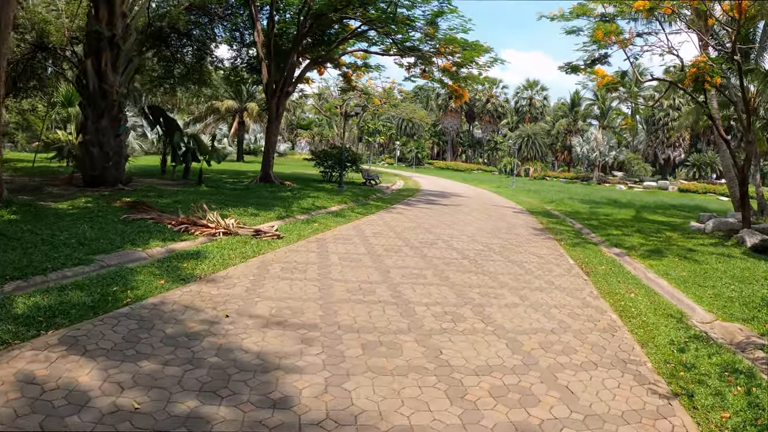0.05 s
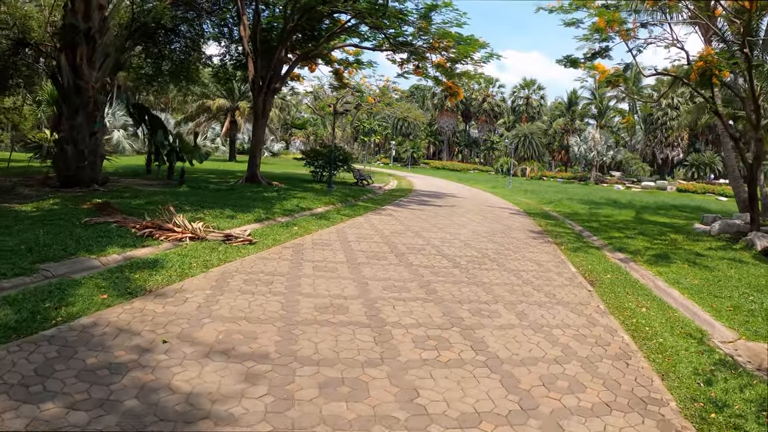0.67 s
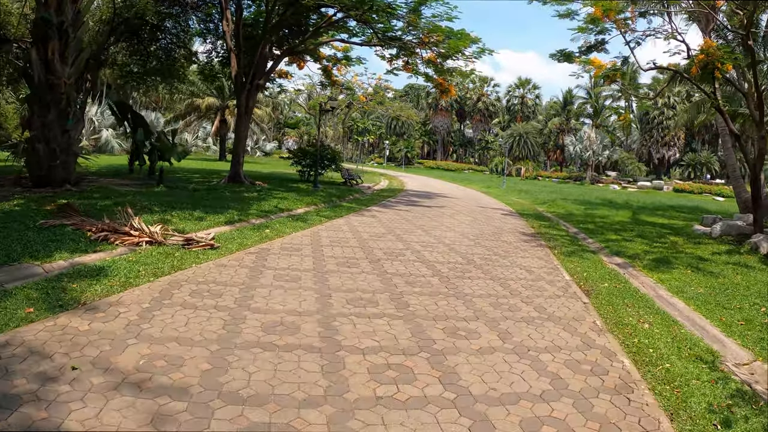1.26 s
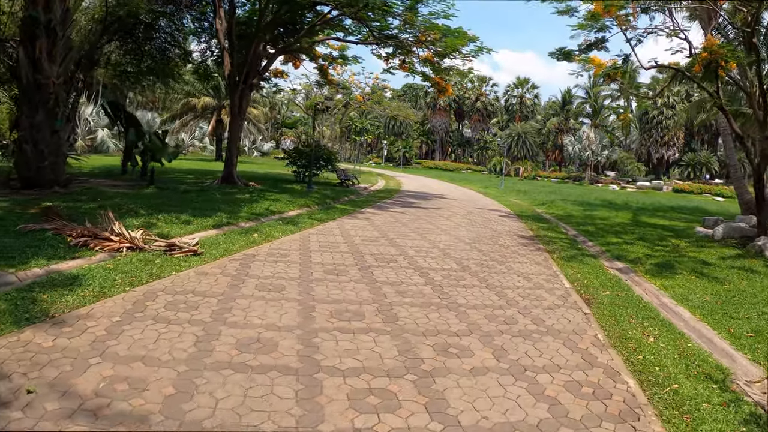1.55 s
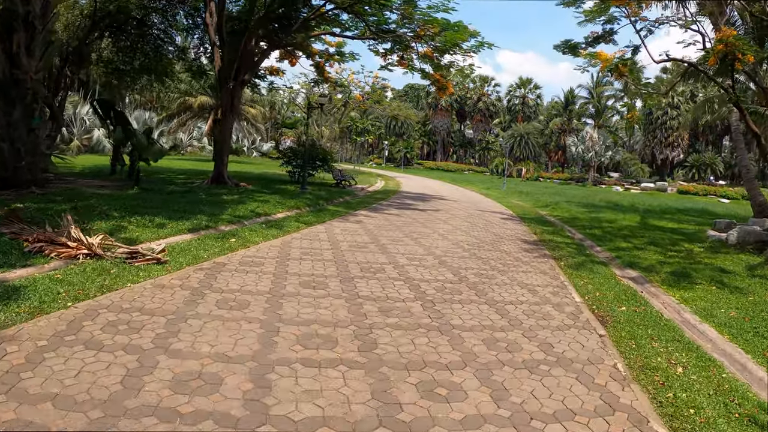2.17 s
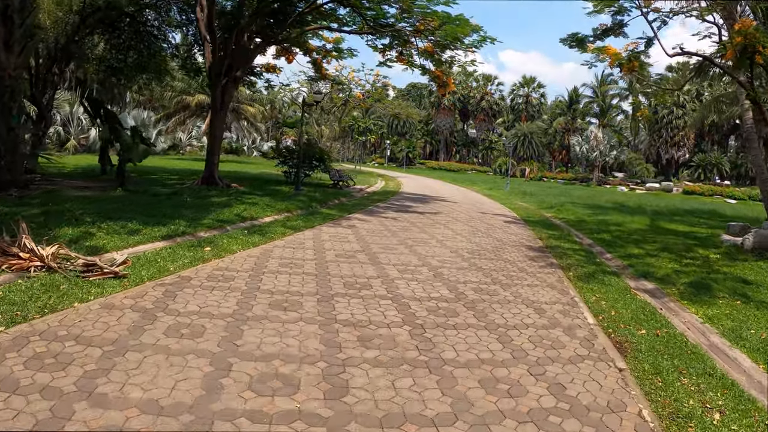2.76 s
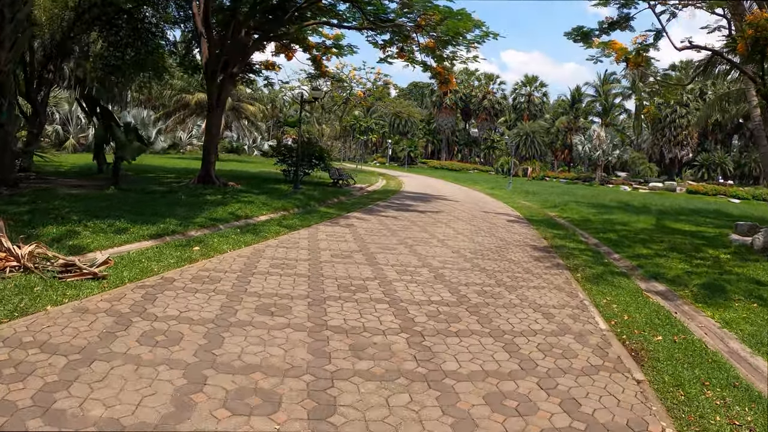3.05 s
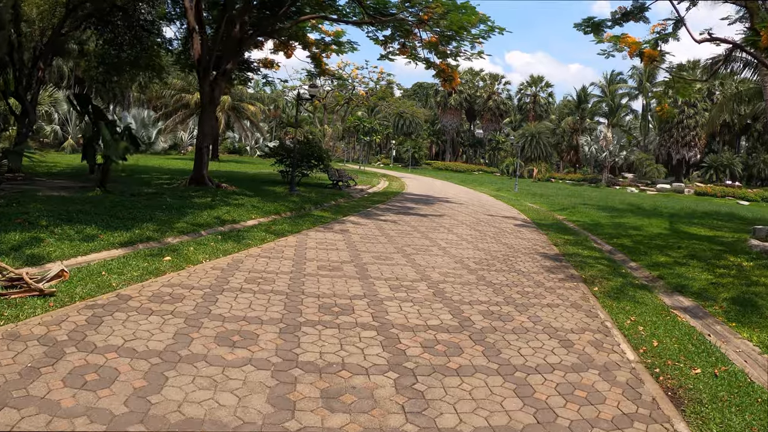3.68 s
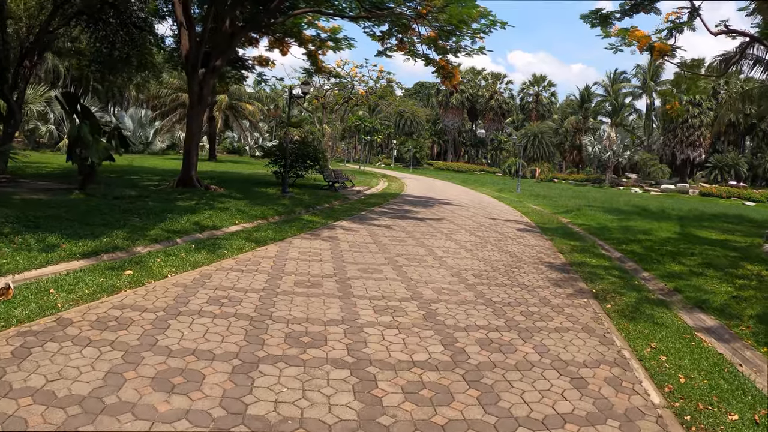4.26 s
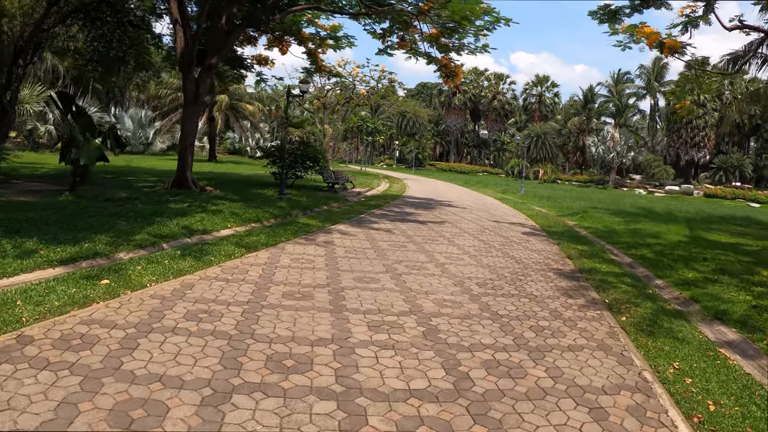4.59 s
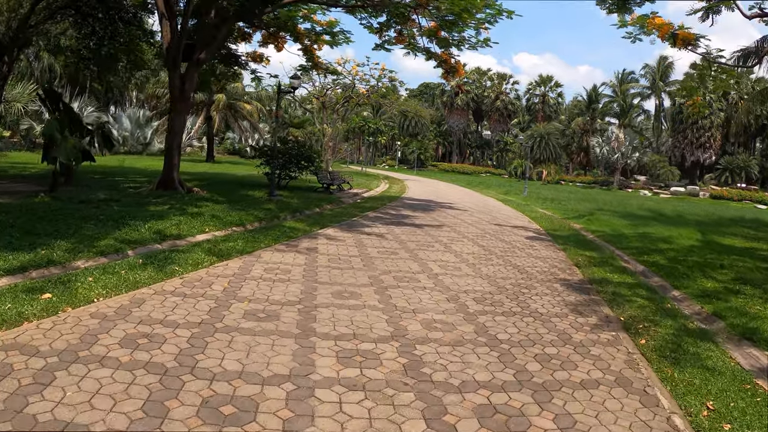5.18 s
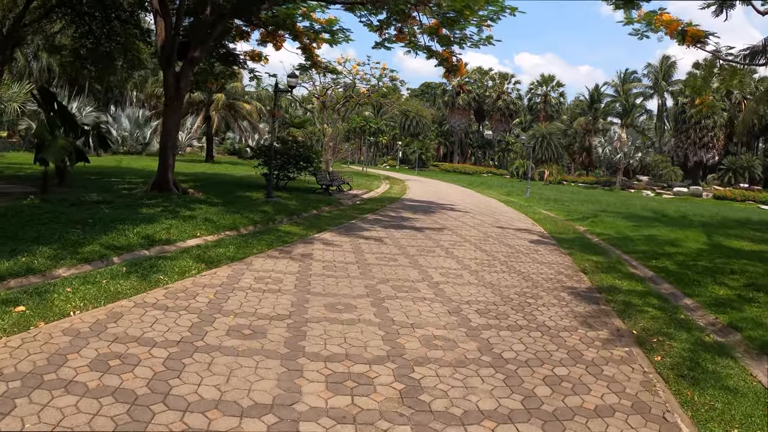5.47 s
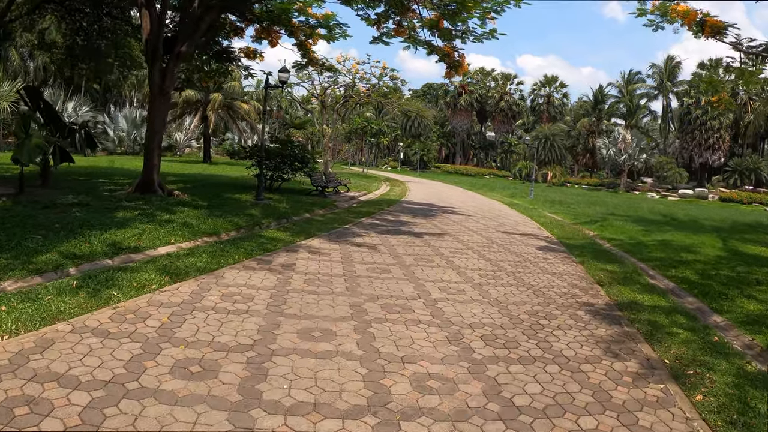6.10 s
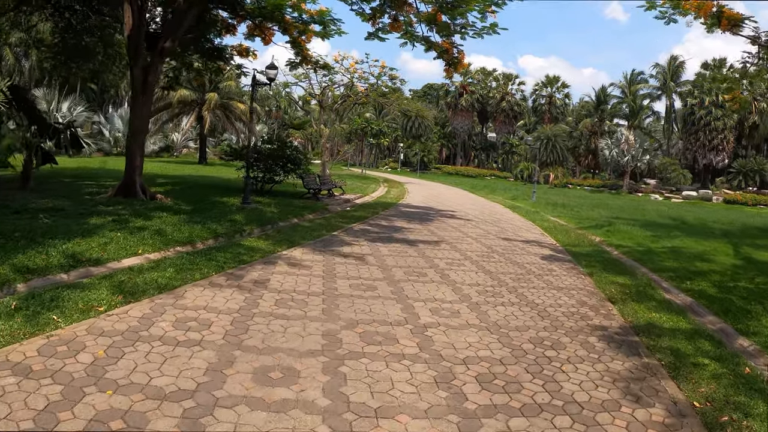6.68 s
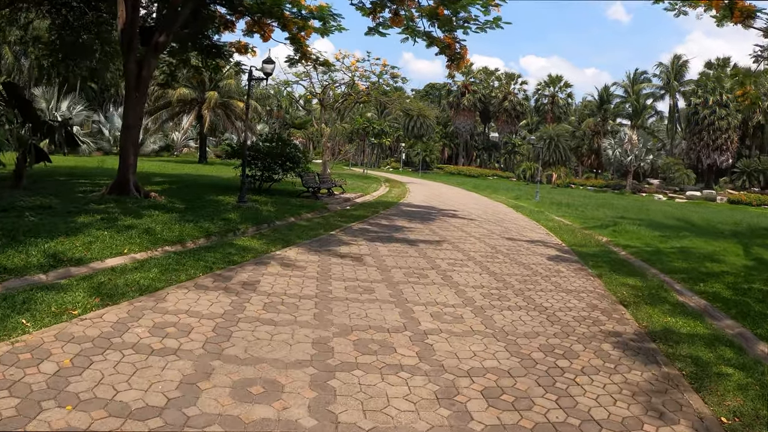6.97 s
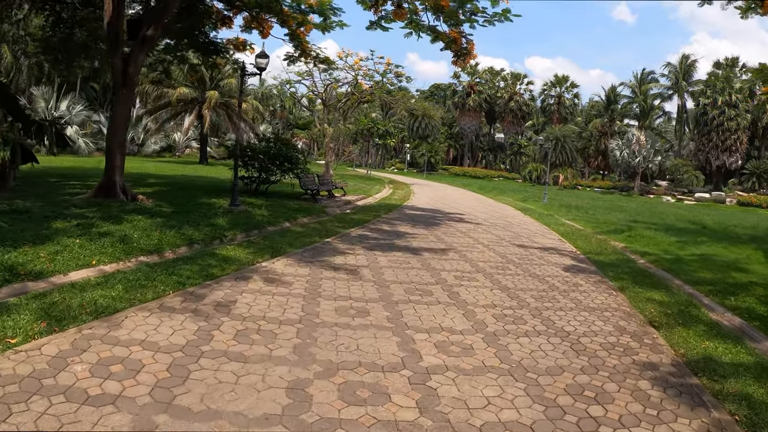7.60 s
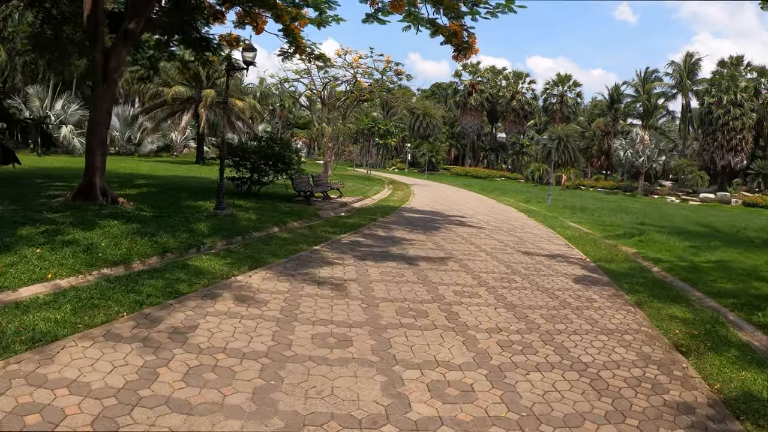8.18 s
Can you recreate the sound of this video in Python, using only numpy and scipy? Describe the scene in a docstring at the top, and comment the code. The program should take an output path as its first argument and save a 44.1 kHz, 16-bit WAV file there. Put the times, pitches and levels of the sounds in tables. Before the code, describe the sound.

A steady low rumble of distant road traffic fills a park throughout, with softer tyre hiss and a very faint rustle of leaves. In the first second a far crow caws quietly and small birds peep and twitter. From about 1 to 2 seconds a thin, high song steps downward over a dry bird rattle. At 3 seconds a grain of grit cracks sharply under a shoe, close by, and a low engine drone comes in. The crow caws faintly again at 4 seconds, while another far engine, slowly gathering speed, swells around 4.5. Small gritty cracks recur between 5 and 7.5 seconds. The engines swell again near 6.8 seconds. From 6.5 to 7.5 a nearer bird gives four quick two-note calls, then a faint wavering song runs on over the traffic until the end, at about 8.5 seconds.

```python
"""A slow walk on a paved park path. Far traffic rumbles and its tyres hiss throughout; leaves rustle.
From the start one engine slowly gathers speed; a far crow caws, small birds peep and twitter in the trees.
Near 1 s a thin song steps down over a dry rattle. From 3 s grit cracks under the soles, close by, and
a second engine drones in; the crow returns at 4 s. From 6.5 s a nearer bird repeats a two-note call,
and a wavering song closes."""
import sys
import numpy as np
from scipy import signal
from scipy.fft import rfft, irfft
from scipy.io import wavfile

SR = 44100
rng = np.random.default_rng(int(sys.argv[2]) if len(sys.argv) > 2 else 0)


def int16_out(signal):
    """Quantize to a 16-bit WAV file."""
    q = np.round(np.clip(np.atleast_2d(signal).T, -1, 1) * 32767)
    wavfile.write(sys.argv[1], SR, q.astype(np.int16))


N = 372512
TIME = np.arange(N) / SR

# noise spectra: f/Hz, relative density/dB
RUMBLE_SPECTRUM = [(8, -23), (16, -5), (27, -4), (45, -3.5), (63, 2), (78, -3), (105, -4.5), (135, -9.5),
                   (165, -15.5)]
ROAR_SPECTRUM = [(125, 0.5), (160, 1.5), (200, -1.5), (255, -5.5), (330, -8.5), (440, -13), (640, -15.5),
                 (850, -25.5)]
TYRE_SPECTRUM = [(600, -15.5), (750, -5.5), (950, 0), (1200, -3), (1500, -7), (1950, -10.5), (2350, -16),
                 (2900, -30.5), (3600, -25.5)]
SCRAPE_SPECTRUM = [(500, -14), (1500, 8), (3000, -7.5), (6000, -15.5), (9000, -27.5), (13000, -32),
                   (15000, -46)]
RUSTLE_SPECTRUM = [(2600, 4), (3200, -3), (3900, -5.5), (5000, -9), (6300, -11.5), (7800, -14.5),
                   (9000, -18.5), (10000, -23.5), (12500, -29.5), (14000, -33.5), (15300, -63.5)]
# traffic density: t/s, level/dB
TRAFFIC_FLOW = [(0, -1.5), (1.2, -0.9), (2.4, -1.5), (3.3, -1.2), (5, -1), (6.9, 0), (8.45, 0)]
# merged engine roar: t/s, level/dB
ROAR_ENVELOPE = [(0, -36), (1.2, -35.5), (3, -34.5), (4.7, -35), (6.4, -34), (7.3, -35.5), (8.45, -34)]
# accelerating engine: exhaust order, peak t/s, half length/s, level/dB
EXHAUST_SWELLS = [(4, 4.45, 0.72, -27), (4, 5.58, .45, -34.5), (4, 6.8, 0.32, -30), (4, 8.14, 0.48, -37),
                  (6, 1.26, 0.46, -37.5), (6, 2.22, 0.32, -37.5), (6, 2.97, 0.37, -36.5),
                  (6, 4.66, 0.59, -37.5), (6, 6.4, 0.15, -38), (8, 1.45, 0.63, -40), (8, 6.4, 0.53, -42.5),
                  (9, 3.2, 0.34, -39.5), (9, 5.1, 1.3, -45), (11, 0.78, 0.42, -45.5), (11, 2.09, .25, -47)]
# second engine: t/s, firing f/Hz, level/dB
DRONE_CURVE = [(0, 78.05, -51), (3, 76, -35), (4.2, 83.3, -31.5), (5.6, 89.2, -32), (6.3, 90, -35.5),
               (6.75, 90.83, -26.5), (7.4, 90, -29), (8.45, 87.9, -28)]
# fainter engines: peak t/s, half length/s, f/Hz, level/dB
ENGINE_HUMS = [(5.3, .35, 207.8, -42.5), (7.1, 0.74, 148.6, -39)]
# single vehicles: peak t/s, half length/s, centre f/Hz, width/Hz, level/dB
VEHICLE_PASSES = [(0.91, 0.22, 295, 92, -43.5), (4, 0.68, 367, 130, -47), (6.46, 0.57, 410, 350, -45),
                  (6.9, 1, 900, 360, -45.5), (3.35, 0.57, 1300, 140, -47.5), (4.87, 0.91, 1250, 190, -48),
                  (5.42, 0.26, 1630, 1300, -48.5), (0.6, 0.28, 1950, 380, -52)]
# two-note calls: slur t/s, flick top f/Hz, rise/share of f, flick level/dB, slur level/dB
TWO_NOTE_CALLS = [(6.55, 4850, .12, -67, -45), (6.817, 4900, 0.099, -52, -41), (7.08, 4880, 0.18, -53, -44),
                  (7.36, 4760, .16, -57, -45)]
# bird notes: t/s, length/s, f/Hz, fall/share of f, level/dB
PEEP_NOTES = [(.115, .13, 2690, 0, -50.5), (.225, .13, 2700, -0.016, -53), (.258, 0.085, 3570, -.025, -52),
              (.468, .13, 3030, 0, -54), (.775, .037, 4200, 0.34, -54), (.958, 0.031, 4870, 0.011, -56),
              (1.298, .04, 3583, 0, -44.5), (1.35, .04, 3590, -0.022, -54), (3.138, 0.03, 4580, 0.08, -52),
              (4.095, 0.039, 3450, .03, -52), (4.425, .07, 3420, .025, -53), (4.52, .045, 4720, -.05, -57)]
WARBLE_NOTES = [(7.305, .065, 3290, 0.011, -54), (7.57, 0.066, 3510, .02, -56),
                (7.812, 0.046, 3350, -0.0056, -50.5), (7.965, .065, 3440, -.05, -56),
                (8.105, 0.048, 3250, .03, -48), (8.257, 0.073, 3060, 0.0022, -50),
                (8.415, .05, 3000, 0, -48)]
THIN_NOTES = [(0.875, 0.17, 9140, 0.22, -57), (1.068, 0.12, 7400, 0.012, -57.5),
              (1.23, 0.12, 6930, 0.06, -56), (1.411, 0.15, 7000, 0.024, -56.5),
              (1.572, 0.17, 6490, .026, -55), (1.759, 0.16, 6360, 0.012, -55)]
# bird rattle: t/s, f/Hz, tick rate/Hz, level/dB
RATTLE_CURVE = [(.97, 3600, 36, -45), (1.1, 3770, 44, -44.5), (1.2, 3500, 56, -42), (1.33, 3400, 55, -45),
                (1.42, 3000, 60, -48), (1.49, 2750, 54, -43), (1.64, 2700, 55, -47)]
# twitters: t/s, length/s, f/Hz, chip sweep/share of f, chip rate/Hz, level/dB
TWITTER_RUNS = [(0.195, 0.75, 4220, 0.74, 31, -60), (1.22, 0.21, 3530, 0.93, 32, -56),
                (5.08, 0.59, 3800, 0.15, 45, -61.5), (6.275, 0.68, 3950, .16, 50, -63),
                (6.279, 0.4, 7640, 0.15, 48, -69.5), (6.899, .22, 3700, 0.36, 62, -53.5),
                (7.0, 0.5, 3310, 0.18, 61, -58), (7.479, 0.7, 3400, 0.12, 58, -65)]
# caws: t/s, length/s, level/dB
CROW_CAWS = [(.15, .56, -49.5), (4.1, 0.33, -47.5)]
# crow's throat resonance: f/Hz, relative gain/dB
CROW_FORMANT = [(900, -21), (1250, -17), (1520, 6.5), (1850, 4.5), (2150, 0.5), (2500, -29)]
# cracking grains: t/s, level/dB, decay/s, ring f/Hz
GRIT_CRACKS = [(2.986, -31, 0.011, 1900), (2.987, -39, 0.0037, 6000), (2.989, -46, .003, 6000),
               (4.945, -51, 0.0074, 3800), (5.582, -47, .021, 4220), (5.608, -43.5, 0.0056, 10000),
               (5.617, -47, 0.0067, 4200), (5.619, -38, 0.006, 6600), (5.625, -44, .014, 6000),
               (5.788, -38, 0.0084, 3000), (6.019, -39, 0.0084, 3870), (6.225, -39, 0.012, 3900),
               (6.231, -38.5, .008, 5950), (6.448, -40.5, .008, 2900), (6.638, -40, 0.0056, 2740),
               (7.48, -45, .014, 2900)]
# swells of the high hiss: peak t/s, boost/dB
RUSTLE_BOOSTS = [(.45, 2.5), (1.35, 3), (3.2, 1.5), (4.3, 1.5), (5.35, 2.5), (6.42, 1.5)]
# noise likeness between channels: f/Hz, correlation
COHERENCE = [(25, .985), (60, .995), (120, .997), (300, .989), (520, .95), (760, .7), (980, .85),
             (1520, .72), (2050, .83), (3100, .72), (4000, .55), (5800, .1), (8000, .28)]
# microphone ports, far sound: f/Hz, left phase lag/rad
PORT_LAG_RAD = [(30, 0), (330, .09), (690, .7), (950, .25), (1400, .5), (1720, .38), (3100, 1.15),
                (4600, 1.25), (6200, 2.9)]
# microphone ports, colour: f/Hz, left minus right/dB
PORT_BALANCE_DB = [(200, .25), (540, 2.1), (850, -1.5), (1500, 0), (2750, 3), (3900, .5), (5200, 0),
                   (7800, -3.7), (9000, 3.7), (11000, .9)]


def road(rumble_db=-26, tyre_db=-39.5):
    """Many far vehicles merge into exhaust rumble, engine roar and the 1 kHz hump of tyres."""
    flow_db, = in_time(TRAFFIC_FLOW)
    roar_db, = in_time(ROAR_ENVELOPE)
    rumble = from_db(rumble_db + 0.73 * flow_db) * coloured(RUMBLE_SPECTRUM)
    roar = from_db(roar_db) * coloured(ROAR_SPECTRUM)
    tyres = from_db(tyre_db + flow_db + 0.5 * drift(20)) * coloured(TYRE_SPECTRUM)
    return rumble + roar + tyres


def accelerating_engine(start_hz=28.4, ramp_hz_per_s=0.54, top_hz=32.5):
    """The cycle rate climbs, then holds; its exhaust orders swell and fade."""
    cycle_hz = np.minimum(start_hz + ramp_hz_per_s * TIME, top_hz)
    out = np.zeros(N)
    for order in sorted({row[0] for row in EXHAUST_SWELLS}):
        swells = sum(from_db(db) * hump(s, half_s) for k, s, half_s, db in EXHAUST_SWELLS if k == order)
        out += swells * far_tone(order * cycle_hz, 0, waver=0.0022, fading_db=1.1)
    return out


def droning_engine():
    """A second engine, heard at its firing rate."""
    firing_hz, level_db = in_time(DRONE_CURVE)
    return far_tone(firing_hz, level_db, waver=0.013, fading_db=0.8)


def engine_hums():
    """Fainter engines come and go, one tone each."""
    return sum(hump(s, half_s) * far_tone(hz, db, waver=0.0061, fading_db=0.6)
               for s, half_s, hz, db in ENGINE_HUMS)


def passes():
    """Single vehicles rise out of the stream, each a band of engine or tyre noise."""
    return sum(from_db(db) * hump(s, half_s) * coloured([(hz - width_hz / 2, 0), (hz + width_hz / 2, 0)])
               for s, half_s, hz, width_hz, db in VEHICLE_PASSES)


def two_note_calls(flick_s=0.04, lead_s=0.058, slur_s=0.075, slur_decay_s=0.05):
    """A nearer bird: upward flick, then downward slur. The high flick scatters more."""
    out = np.zeros((2, N))
    for s, top_hz, rise, flick_db, slur_db in TWO_NOTE_CALLS:
        flick_hz = top_hz * (1 - rise * np.linspace(1, 0, 3) ** 2)
        flick = note(flick_s, flick_hz, tremble=0.007, flutter_db=2, bend=0.45)
        slur = note(slur_s, pitches_hz=(3020, 2400, 2230), tremble=0.025, flutter_db=2, bend=0.85)
        slur *= np.exp(-(TIME[:len(slur)] / slur_decay_s) ** 2 / 2)
        add(out, s - lead_s, from_db(flick_db) * among_trees(flick, t60_s=0.5, wet_db=2))
        add(out, s, from_db(slur_db) * among_trees(slur, t60_s=0.43, wet_db=1.5))
    return out


def peeps():
    """Scattered peeps from deep in the crowns."""
    return note_run(PEEP_NOTES, tremble=0.011, flutter_db=1, t60_s=0.5, wet_db=1.5)


def warble():
    """A wavering song that drifts down."""
    return note_run(WARBLE_NOTES, tremble=0.0091, flutter_db=3, t60_s=0.59, wet_db=3)


def rattle(tick_s=0.005, pitch_scatter=0.12):
    """A bird's dry ticks speed up and sink, each off in pitch and strength."""
    pitch_hz, rate_hz, level_db = in_time(RATTLE_CURVE)
    tick_count = np.floor(np.cumsum(rate_hz) / SR)
    starts = np.flatnonzero(np.diff(tick_count))
    starts = starts[(TIME[starts] > RATTLE_CURVE[0][0]) & (TIME[starts] < RATTLE_CURVE[-1][0])]
    out, window = np.zeros(N), np.hanning(int(tick_s * SR))
    for at, (sharp, strong) in zip(starts, rng.standard_normal((len(starts), 2))):
        hz = pitch_hz[at] * (1 + pitch_scatter * sharp) * np.linspace(1.15, 0.85, len(window))
        add(out, TIME[at], from_db(level_db[at] + 2 * strong) * window * sine(hz))
    return among_trees(out, t60_s=0.4, wet_db=-1)[:, :N]


def crow(start_hz=315.2, end_hz=282.4):
    """A hoarse harmonic stack; only the throat's loudest partials carry this far."""
    out = np.zeros((2, N))
    for s, length_s, db in CROW_CAWS:
        u = np.linspace(0, 1, int(length_s * SR))
        hz = (start_hz + (end_hz - start_hz) * u ** 2) * (1 + 0.02 * drift(59)[:len(u)])
        stack = sum(from_db(at_hz(CROW_FORMANT, k * hz)) * sine(k * hz) for k in range(3, 10))
        add(out, s, from_db(db) * among_trees(rms_one(stack * arch(u)), t60_s=0.92, wet_db=-1.5))
    return out


def thin_song(pan_db=0.5):
    """A small bird, slightly right, slides in from very high and steps down."""
    song = note_run(THIN_NOTES, tremble=0.007, flutter_db=2.5, t60_s=0.67, wet_db=8)
    return song * from_db([[-pan_db / 2], [pan_db / 2]])


def twitters(pitch_sag=0.03):
    """Farther birds run uneven downward chips together; the trees blur them."""
    out = np.zeros((2, N))
    for s, length_s, pitch_hz, sweep, rate_hz, db in TWITTER_RUNS:
        u = np.linspace(0, 1, int(length_s * SR))
        chip_phase = np.cumsum(rate_hz * from_db(1.2 * drift(10)[:len(u)])) / SR % 1
        chip_glide = 1 + sweep * (0.5 - chip_phase + 0.08 * drift(30)[:len(u)])
        hz = pitch_hz * (1 + pitch_sag * (0.5 - u)) * chip_glide
        chips = rms_one(arch(u) * np.sin(np.pi * chip_phase) * sine(hz))
        add(out, s, from_db(db) * among_trees(chips, t60_s=0.87, wet_db=6))
    return out


def grit(ring_width_hz=880, scrape_db=2, attack_s=0.00053):
    """A grain cracks between sole and paver: a rough burst that rings at one pitch and dies."""
    out = np.zeros((2, N))
    scrape = coloured(SCRAPE_SPECTRUM) * from_db(1.4 * drift(300))
    t = TIME[:SR // 10]
    for s, db, decay_s, hz in GRIT_CRACKS:
        crunch = np.roll(scrape, -int(s * SR), axis=1)[:, :len(t)]
        body = rms_one(resonance(crunch, hz, ring_width_hz)) + from_db(scrape_db) * crunch
        pressure = (1 - np.exp(-t / attack_s)) * np.exp(-t / decay_s)
        burst = rms_one(pressure * body) * np.sqrt(np.mean(pressure ** 2))
        add(out, s, from_db(db) * burst)
    return out


def rustle(rest_db=-56, swell_half_s=0.43):
    """Faint, flickering hiss of leaves and soft soles."""
    swell_db = sum(db * hump(s, swell_half_s) for s, db in RUSTLE_BOOSTS)
    return from_db(rest_db + swell_db + 0.8 * drift(25)) * coloured(RUSTLE_SPECTRUM)


def far_tone(hz, level_db, waver, fading_db):
    """An engine line wavers and fades on its long path through moving air."""
    amplitude = np.sqrt(2) * from_db(level_db + fading_db * drift(2))
    return amplitude * sine(hz * (1 + waver * drift(5.3)))


def note(length_s, pitches_hz, tremble, flutter_db, bend=1):
    """A trembling tone glides through three pitches; bend < 1 glides early."""
    u = np.linspace(0, 1, int(length_s * SR))
    glide_hz = np.polyval(np.polyfit([0, 0.5, 1], pitches_hz, 2), u ** bend)
    hz = glide_hz * (1 + tremble * drift(100)[:len(u)])
    return arch(u) * from_db(flutter_db * drift(43)[:len(u)]) * sine(hz)


def note_run(rows, tremble, flutter_db, t60_s, wet_db):
    """Straight glides, each blurred by echoes."""
    out = np.zeros((2, N))
    for s, length_s, hz, fall, db in rows:
        pitches_hz = hz * (1 + fall * np.array([0.5, 0, -0.5]))
        tone = note(length_s, pitches_hz, tremble, flutter_db)
        add(out, s, from_db(db) * among_trees(tone, t60_s, wet_db))
    return out


def among_trees(sound, t60_s, wet_db):
    """Trunks and crowns add dying echoes, different per channel, at unchanged energy."""
    paths = rng.standard_normal((2, SR)) * from_db(-60 * TIME[:SR] / t60_s)
    paths *= from_db(wet_db) / np.sqrt(np.sum(paths ** 2, axis=1, keepdims=True))
    paths[:, 0] = 1  # direct path
    heard = signal.fftconvolve(sound[None], paths, axes=1)
    return heard * np.sqrt(np.sum(sound ** 2) / np.sum(heard ** 2, axis=1, keepdims=True))


def coloured(spectrum):
    """Unit-rms stereo noise with steep skirts: coherent bass, diffuse treble."""
    hz = np.fft.rfftfreq(N, 1 / SR) + 1e-3
    skirts = 1 / (1 + (spectrum[0][0] / hz) ** 12) / (1 + (hz / spectrum[-1][0]) ** 12)
    alike = at_hz(COHERENCE, hz)
    mid, side = rfft(rng.standard_normal((2, N))) * from_db(at_hz(spectrum, hz)) * skirts
    return rms_one(irfft(np.sqrt(1 + alike) * mid + np.sqrt(1 - alike) * side * [[1], [-1]], N))


def drift(rate_hz):
    """Low-passed random curve, rms about 1."""
    hop, settle = 40, 2000
    r = np.exp(-2 * np.pi * rate_hz * hop / SR)
    slow = signal.lfilter([1], [1, -2 * r, r * r], rng.standard_normal(N // hop + settle + 2))[settle:]
    return np.interp(np.arange(N) / hop, np.arange(len(slow)), rms_one(slow))


def resonance(x, hz, width_hz):
    """Two-pole band-pass, unit peak gain."""
    r = np.exp(-np.pi * width_hz / SR)
    feedback = [1, -2 * r * np.cos(2 * np.pi * hz / SR), r * r]
    return signal.lfilter(np.array([1, 0, -1]) * (1 - r * r) / 2, feedback, x)


def between_ports(x, left_over_right):
    """Split a frequency-dependent ratio evenly between the channels."""
    half = np.sqrt(left_over_right(np.fft.rfftfreq(N, 1 / SR) + 1e-3))
    return irfft(rfft(x) * [half, 1 / half], N)


def sine(hz):
    """Tone along a pitch curve, random phase."""
    return np.sin(2 * np.pi * (np.cumsum(hz) / SR + rng.random()))


def arch(u):
    """Note envelope over u = 0..1."""
    return np.sqrt(np.abs(np.sin(np.pi * u)))


def hump(s, half_s):
    """Gaussian of height 1 at time s."""
    return np.exp(-((TIME - s) / half_s) ** 2)


def in_time(rows):
    """Each column of a curve at every sample."""
    s, *columns = np.transpose(rows)
    return [np.interp(TIME, s, c) for c in columns]


def at_hz(points, hz):
    """Interpolate on a log-frequency axis."""
    points_hz, values = np.transpose(points)
    return np.interp(np.log(hz), np.log(points_hz), values)


def add(out, s, sound):
    """Mix in at time s."""
    at = max(round(s * SR), 0)
    out[..., at:at + sound.shape[-1]] += sound[..., :N - at]


def from_db(db):
    """Decibels to gain."""
    return 10 ** (np.asarray(db) / 20)


def rms_one(x):
    """Scale to unit rms."""
    return x / np.sqrt(np.mean(x ** 2) + 1e-20)


def scene():
    """Traffic and leaves, slightly late at the left port; birds in the trees; grit close by."""
    far = road() + passes() + accelerating_engine() + engine_hums() + droning_engine() + rustle()
    far = between_ports(far, lambda hz: np.exp(-1j * at_hz(PORT_LAG_RAD, hz)))
    birds = thin_song() + two_note_calls() + peeps() + warble() + rattle() + twitters() + crow()
    return far + birds + grit()


def record(dry):
    """Each port adds its colour; a steep low-pass cuts the top."""
    stop_hz = 15600
    heard = between_ports(dry, lambda hz: from_db(at_hz(PORT_BALANCE_DB, hz)))
    return signal.sosfilt(signal.cheby2(12, 70, stop_hz, fs=SR, output="sos"), heard)


dry = scene()
out = record(dry)
int16_out(out)
```